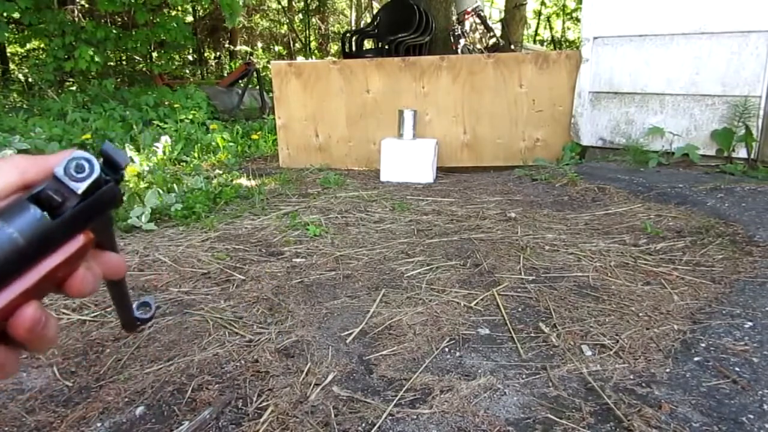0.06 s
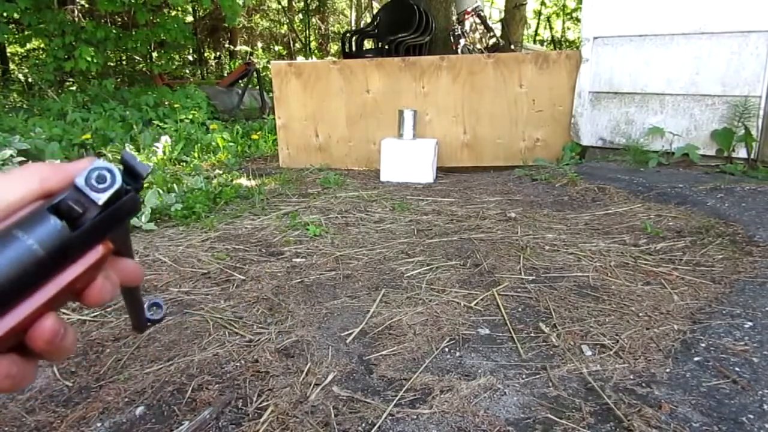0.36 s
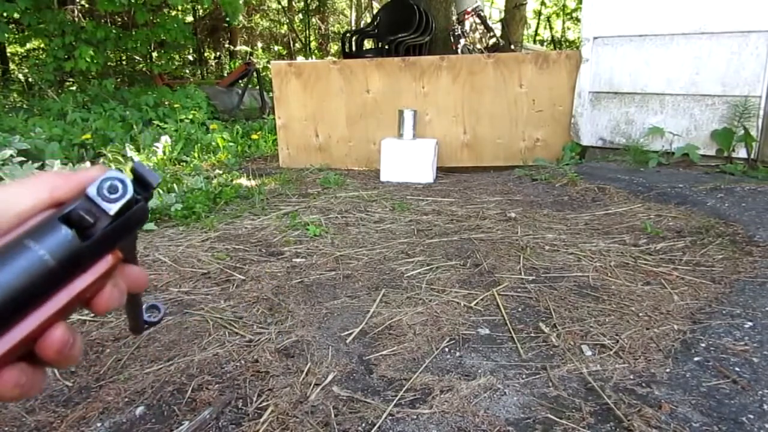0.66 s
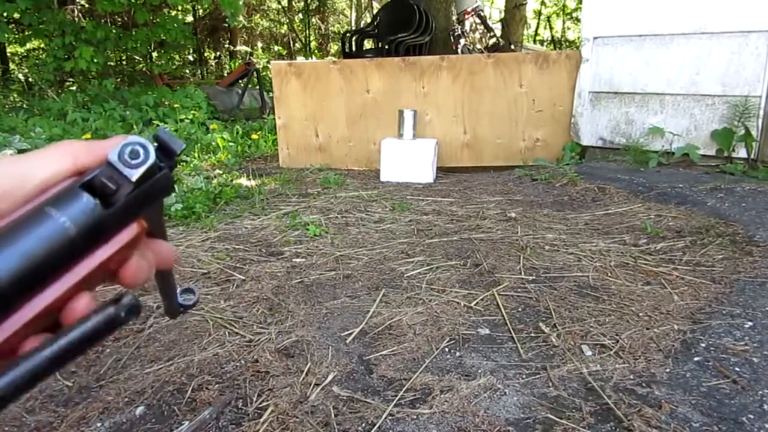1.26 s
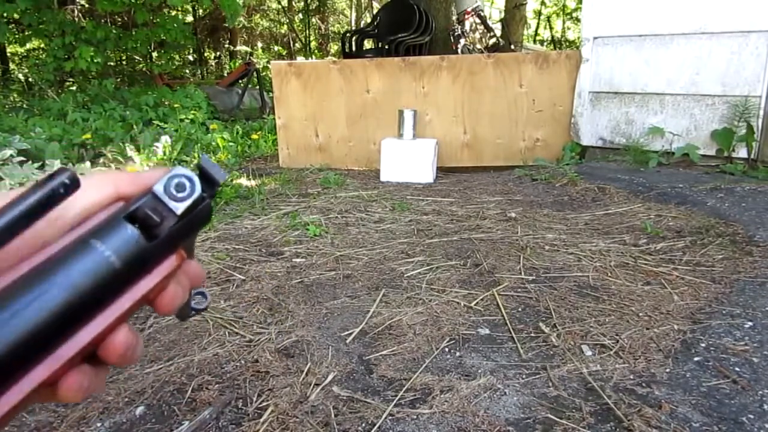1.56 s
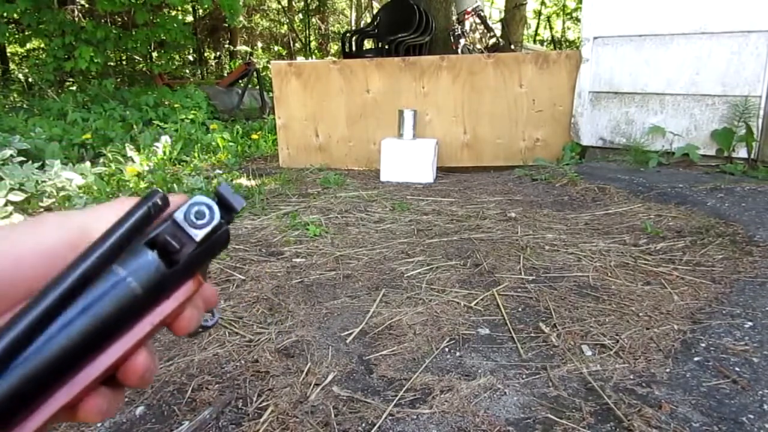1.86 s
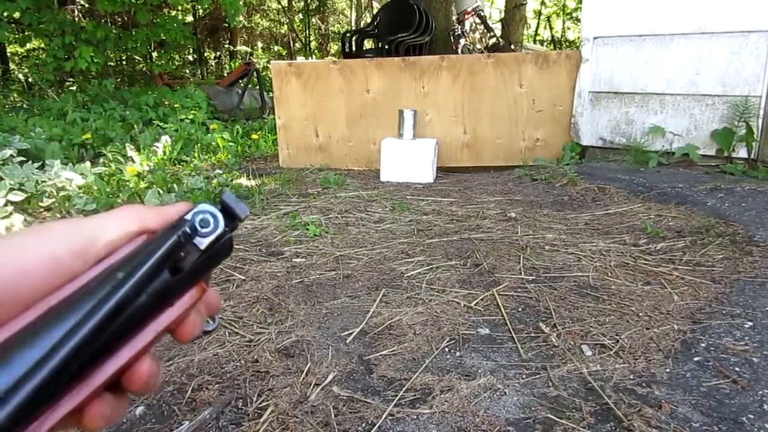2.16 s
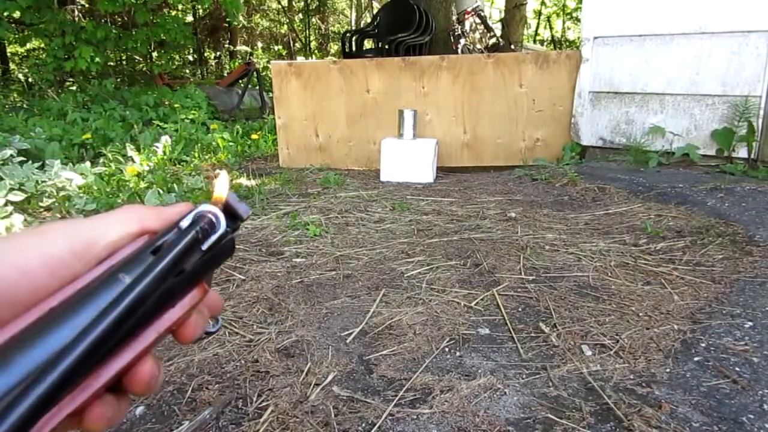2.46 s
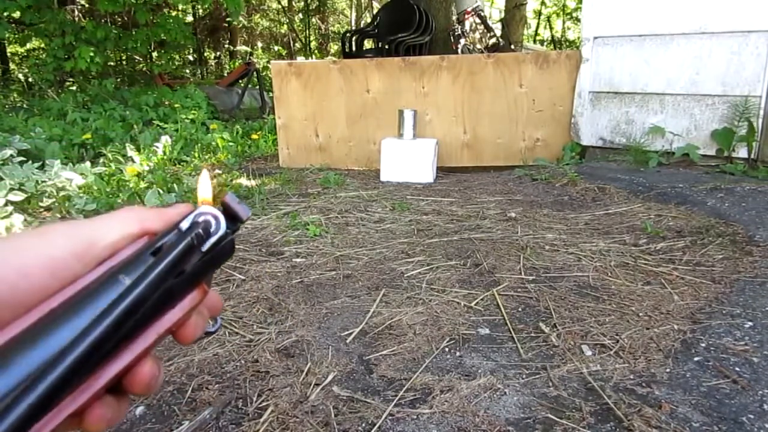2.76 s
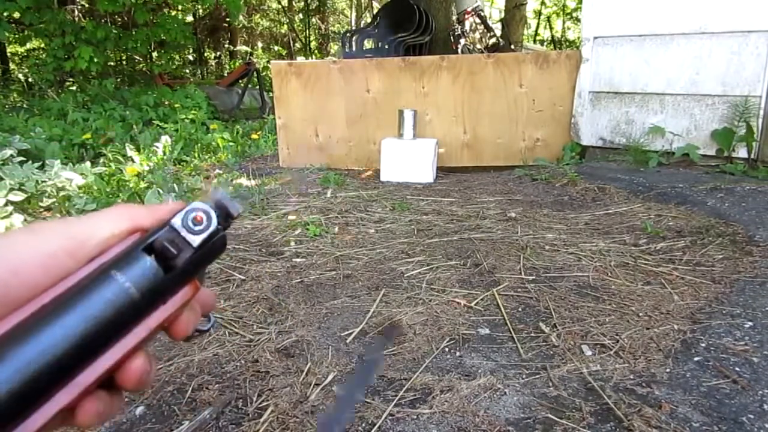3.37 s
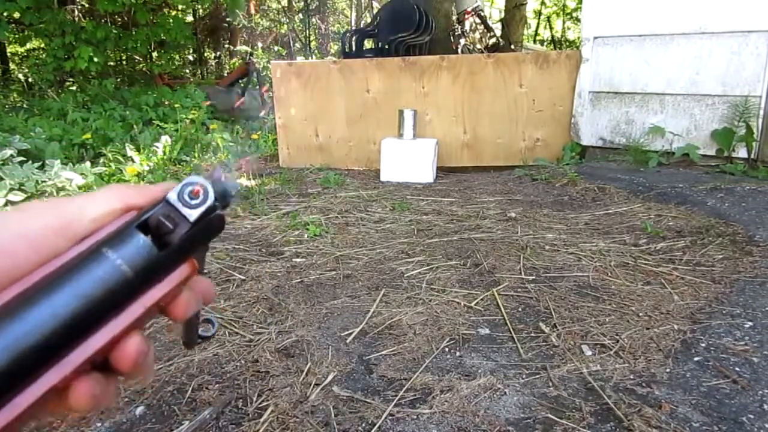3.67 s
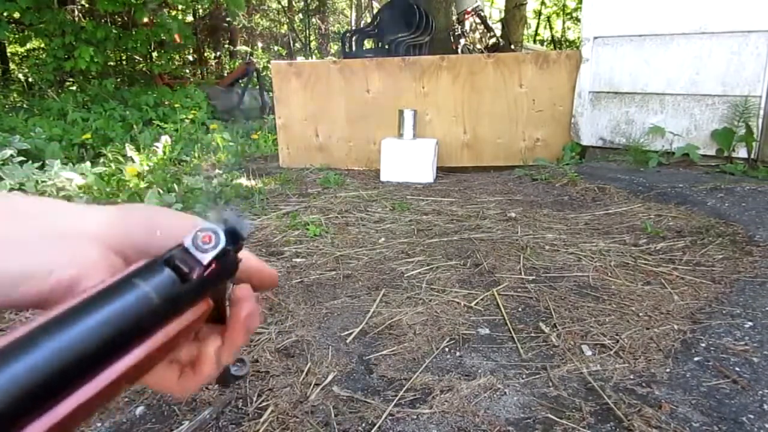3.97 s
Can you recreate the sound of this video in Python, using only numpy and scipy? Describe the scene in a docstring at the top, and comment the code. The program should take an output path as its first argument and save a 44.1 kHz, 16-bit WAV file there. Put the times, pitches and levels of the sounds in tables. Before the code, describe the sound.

A pellet gun's metal parts clack close by, latching at 0.3 seconds, followed by faint hand rubbing. Light taps come near 1 second and around 2. A lighter snaps sharply at 2.4 seconds with a short fading hiss. From about 3.3 a fuse softly hisses and spits. The loudest clacks hit at 3.6, with smaller rattles until 4. A faint motor hum and low outdoor rumble continue throughout.

```python
"""Close metal clacks: the lever and breech of a pellet gun, handled in a back yard. A hand rubs the stock,
a long lighter taps the muzzle, snaps alight and sets a fuse hissing, then the gun clacks again as the
grip changes. Knocks are noise bursts plus ringing modes; the fuse is sputtering noise with sparks.
A motor hums faintly behind it all. The loudest snaps overload the recorder, whose gain control ducks
and slowly recovers."""
import sys
import numpy as np
from scipy import signal
from scipy.fft import rfft, irfft, next_fast_len
from scipy.io import wavfile
from scipy.ndimage import uniform_filter1d

SR = 44100
rng = np.random.default_rng(int(sys.argv[2]) if len(sys.argv) > 2 else 0)


def digitize_waveform(pressure):
    """Quantize a signal to 16-bit integers and store it at the path in sys.argv[1].

    Rows of a 2-D input are taken as channels; values are limited to [-1, 1].
    """
    field = np.atleast_2d(pressure).T
    bounded = np.clip(field, -1, 1)
    quanta = np.round(bounded * 32767).astype(np.int16)
    wavfile.write(sys.argv[1], SR, quanta)


N = 176400
TIME = np.arange(N) / SR

# metal parts knocking: t/s, ring level/dB, focus f/Hz, crack level/dB, thud level/dB
CLACKS = [(.0015, -15.5, 2250, -22.5, -50), (0.1597, -19.5, 1360, -29.5, -62),
          (0.2875, -20.5, 2330, -26.5, -48), (0.2924, -18.5, 1413, -25, -50),
          (0.3339, -13, 1616, -15.5, -38), (3.5817, 0.5, 1690, -9.5, -8.5), (3.5847, -2.5, 3100, -18, -26),
          (3.5892, -14, 1320, -15, -29), (3.6058, 1, 1457, 5.5, -4.5), (3.6500, -13, 2240, -26.5, -23.5),
          (3.7726, -20.5, 1200, -37, -24.5), (3.8063, -19.5, 1630, -19, -33),
          (3.8103, -11, 1548, -23.5, -20), (3.8139, -10.5, 1703, -10.5, -29),
          (3.9085, -12.5, 1536, -28, -25), (3.9368, -21.5, 2020, -26.5, -17.5),
          (3.984, -28.5, 1680, -44, -29)]
# hard-contact spectrum: f/Hz, level/dB
CRACK_SPECTRUM = [(300, -41.5), (3300, -1), (6300, 1), (7900, 2.5), (10000, -3.5), (16000, -14)]
THUD_HZ, THUD_T60_S = 328, 0.011
LATCH_S, LATCH_DB, LATCH_HZ, LATCH_BEAT_HZ, LATCH_T60_S = 0.334, -9, 1160, 95.5, 0.029


def gun():
    """Each clack is ringing steel, a thud in the stock and a crack; the latch adds a beating note."""
    times, ring_db, focus_hz, crack_db, thud_db = np.transpose(CLACKS)
    steel = sum(steel_ring(*clack) for clack in zip(times, ring_db, focus_hz))
    steel = signal.sosfilt(signal.butter(2, [600, 6000], "band", fs=SR, output="sos"), steel)
    thud = ring(clicks(times, from_db(thud_db)), THUD_HZ, THUD_T60_S)
    thud = signal.sosfilt(signal.butter(2, 900, fs=SR, output="sos"), thud)
    crack = colour(bursts(times, crack_db, t60_s=0.01), CRACK_SPECTRUM)
    seat = clicks([LATCH_S], [from_db(LATCH_DB)])
    latch = ring(seat, LATCH_HZ, LATCH_T60_S) - ring(seat, LATCH_HZ + LATCH_BEAT_HZ, LATCH_T60_S)
    return steel + thud + crack + latch


# gun steel modes: f/Hz, level/dB, t60/s
STEEL_MODES = [(735, -5, 0.017), (954, -4.5, 0.02), (1129, -1.5, 0.025), (1388, -2.5, 0.015),
               (1662, -5.5, 0.021), (1950, -5.5, 0.021), (2260, -1.5, 0.014), (2718, -0.5, 0.017),
               (3150, -5, 0.012), (4270, -3.5, 0.011), (4940, -2, 0.0098)]
FOCUS_DB, FOCUS_OCTAVES = 9, 0.2
BOUNCE_GAP_S, BOUNCE_LOSS_DB = 0.0045, 15.5


def steel_ring(start_s, db, focus_hz):
    """The contact point pulls the modes to its pitch and favours those near it; the part bounces twice."""
    hz, mode_db, t60_s = np.transpose(STEEL_MODES)
    nearest = np.argmin(abs(np.log(hz / focus_hz)))
    hz = hz * focus_hz / hz[nearest]
    boost_db = FOCUS_DB * np.exp(-(np.log2(hz / focus_hz) / FOCUS_OCTAVES) ** 2)
    out = 0
    for bounce in range(3):
        shares = from_db(mode_db + boost_db + rng.normal(0, 1, len(hz))) * rng.choice([-1, 1], len(hz))
        strength = from_db(db - BOUNCE_LOSS_DB * np.sqrt(bounce))
        out = out + struck(start_s, hz, strength * shares / np.linalg.norm(shares), t60_s)
        start_s = start_s + BOUNCE_GAP_S * rng.uniform(0.5, 2.2)
    return out


# nozzle on muzzle: t/s, level/dB, ring f/Hz
TAPS = [(0.9904, -37.5, 6140), (1.0213, -30, 1170), (1.832, -38.5, 2260), (2.0045, -34.5, 2260),
        (2.065, -30, 4850), (2.1277, -38, 6300), (2.1683, -35, 5330), (2.2044, -21.5, 5280),
        (3.196, -33.5, 7100), (3.231, -32.5, 5250)]
# tap spectrum: f/Hz, level/dB
TAP_SPECTRUM = [(600, -9), (1100, 2.5), (2800, -1.5), (5400, 3), (16000, -16)]
TAP_TRIM_DB = -3


def nozzle_taps():
    """The lighter's nozzle taps the muzzle: a tick and one ringing mode each time."""
    times, levels_db, _ = np.transpose(TAPS)
    ticks = colour(bursts(times, levels_db, t60_s=0.012), TAP_SPECTRUM)
    rings = sum(struck(start_s, hz, from_db(db), t60_s=0.0099) for start_s, db, hz in TAPS)
    return from_db(TAP_TRIM_DB) * (ticks + rings)


# lighter case modes: f/Hz, level/dB
CASE_MODES = [(1170, -4), (1700, -8), (2350, -10), (2900, -6), (5050, -8.5), (5850, -2.5), (6550, -5),
              (8200, -0.5), (10500, -8), (13200, -8.5)]
# spectrum of the hissing tail after the snap: f/Hz, level/dB
TAIL_SPECTRUM = [(3000, -14), (4500, -2.5), (6500, -5.5), (7900, 2.5), (10000, -17)]
SNAP_S, SNAP_DB, PUSH_LENGTH_S, PUSH_DB = 2.4422, -2.5, 0.00072, -6.5
TAIL_DB, TAIL_T60_S = -36.5, 0.33
GAS_HZ, GAS_DB, GAS_SPAN_S = 3850, -66, (2.9, 3.119, 3.4, 3.9)


def lighter():
    """The striker pushes, snaps and rings the case; a bright hissing tail fades; the gas whistles."""
    push_phase = np.pi * np.clip((SNAP_S - TIME) / PUSH_LENGTH_S, 0, 1)
    push = -from_db(PUSH_DB) * np.sqrt(np.sin(push_phase).clip(0))
    snap = colour(bursts([SNAP_S], [SNAP_DB], t60_s=0.012), CRACK_SPECTRUM)
    case_hz, case_db = np.transpose(CASE_MODES)
    signs = (-1) ** np.arange(len(case_hz))
    case = struck(SNAP_S, case_hz, from_db(case_db) * signs, t60_s=0.013)
    tail = from_db(TAIL_DB) * decay(SNAP_S, TAIL_T60_S) * noise(TAIL_SPECTRUM)
    gas = from_db(GAS_DB) * np.interp(TIME, GAS_SPAN_S, [0, 1, 1, 0]) * narrow(GAS_HZ, width_hz=300)
    return push + snap + case + tail + gas


# burn strength: t/s, level/dB
BURN_LEVEL = [(2.95, -71), (3.335, -61), (3.36, -46.5), (3.44, -48.5), (3.57, -50.5), (3.7, -48.5),
              (3.79, -56), (3.86, -51.5)]
# powder spits: t/s, level/dB
SPITS = [(3.025, -45), (3.1077, -44), (3.315, -42), (3.4267, -29.5), (3.4452, -18)]
# hiss spectrum: f/Hz, level/dB
FUSE_SPECTRUM = [(200, -3.5), (1650, 1), (3000, -5), (3900, -2), (5200, -3.5), (10500, -7), (15000, -22)]
# flare spectrum: f/Hz, level/dB
FLARE_SPECTRUM = [(170, 2.5), (400, -1), (1000, 3), (1600, -5), (3000, -23)]
SPARKS_PER_S, SPARKS_DB, SPUTTERS_PER_S, SPUTTER_DB = 560, -9.5, 140, 2.5
SIZZLE_HZ, SIZZLE_DB = 10330, -8
FLARE_S, FLARE_ATTACK_S, FLARE_T60_S, FLARE_DB = 3.34, 0.025, 1, -39


def fuse():
    """The powder catches with a soft flare and burns unevenly: hiss, high sizzle, sparks and spits."""
    spark_sizes = from_db(7.8 * np.minimum(rng.exponential(1, N), 4)) * rng.choice([-1, 1], N)
    sparks = unit_rms(spark_sizes * (rng.random(N) < SPARKS_PER_S / SR))
    burn_db = np.interp(TIME, *np.transpose(BURN_LEVEL)) + SPUTTER_DB * drift(SPUTTERS_PER_S)
    burn = from_db(burn_db) * (TIME > BURN_LEVEL[0][0])
    jet = burn * (rng.standard_normal(N) + from_db(SPARKS_DB) * sparks)
    sizzle = burn * from_db(SIZZLE_DB) * narrow(SIZZLE_HZ, width_hz=2100)
    flare_rise = np.clip((TIME - FLARE_S) / FLARE_ATTACK_S, 0, 1)
    flare = from_db(FLARE_DB) * flare_rise * decay(FLARE_S, FLARE_T60_S) * noise(FLARE_SPECTRUM)
    spits = bursts(*np.transpose(SPITS), t60_s=0.012)
    return colour(jet + spits, FUSE_SPECTRUM) + sizzle + flare


# slides on the stock: centre t/s, length/s, level/dB
RUBS = [(0.358, 0.1, -54.5), (0.473, 0.064, -49), (0.559, 0.063, -52.5), (0.94, 0.043, -55)]
# rub spectrum: f/Hz, level/dB
RUB_SPECTRUM = [(300, 1), (2400, 3), (4000, -0.5), (9000, -3), (16000, -17)]
# grip squeaks: centre t/s, length/s, level/dB, f/Hz
SQUEAKS = [(0.059, 0.055, -60, 2900), (.78, .2, -65.5, 2400), (1.172, 0.0092, -50, 5700)]
SLIP_DEPTH_DB = 5


def hand():
    """Skin sticks and slips over the stock in grainy swells and squeaks faintly where it grips."""
    slips = from_db(SLIP_DEPTH_DB * drift(rate_hz=350))
    rubs = sum(swell(*rub) for rub in RUBS) * unit_rms(slips * noise(RUB_SPECTRUM))
    squeaks = sum(swell(centre_s, length_s, db) * unit_rms(slips * narrow(hz, width_hz=1300))
                  for centre_s, length_s, db, hz in SQUEAKS)
    return rubs + squeaks


ECHO_S, ECHO_DB, SCATTER_DB, SCATTER_T60_S = 0.013, -28.5, -22, 0.066


def yard_echo(x):
    """One echo from the house wall, trailed by a short, faint scatter."""
    scatter = decay(ECHO_S, SCATTER_T60_S) * rng.standard_normal(N)
    scatter = from_db(SCATTER_DB) * scatter / np.linalg.norm(scatter)
    wall = clicks([ECHO_S], [from_db(ECHO_DB)])
    return signal.fftconvolve(x, wall + scatter)[:N]


# background hum and hiss level, a set curve swelling as the recorder's gain recovers: t/s, level/dB
BACKGROUND_LEVEL = [(.2, -54.5), (1.1, -48.5), (2.35, -47.5), (4, -53.5)]
# motor tones: f/Hz, relative level/dB
HUMS = [(78.6, -2.5), (1500, -12.5)]
# hiss spectrum: f/Hz, level/dB
AIR_SPECTRUM = [(2400, 0), (5500, -2.5), (10500, -5.5), (16000, -18)]
FLUTTER_DB, WANDER_HZ, WHINE_HZ, WHINE_DB = 3.5, 2.19, 1265, -8
AIR_DB, AIR_SWELL_SHARE = -62, 0.63


def hum_and_hiss():
    """A motor's fluttering hum and whine, and airy hiss; all swell early and ease off later."""
    level_db = np.interp(TIME, *np.transpose(BACKGROUND_LEVEL))
    hum = 0
    for hz, db in HUMS:
        flutter = from_db(FLUTTER_DB * np.tanh(drift(rate_hz=30)))
        phase = 2 * np.pi * np.cumsum(hz + WANDER_HZ * drift(rate_hz=20)) / SR
        hum = hum + from_db(db) * unit_rms(flutter * np.sin(phase))
    whine = from_db(WHINE_DB) * narrow(WHINE_HZ, width_hz=100)
    air = from_db(AIR_DB + AIR_SWELL_SHARE * (level_db - level_db.mean())) * noise(AIR_SPECTRUM)
    return from_db(level_db) * (hum + whine) + air


# rumble strength: t/s, level/dB
RUMBLE_LEVEL = [(.26, -52), (.45, -47), (.9, -51), (1.25, -51.5), (1.6, -46), (2.35, -50), (2.7, -50),
                (4, -48.5)]
# rumble spectrum: f/Hz, level/dB
RUMBLE_SPECTRUM = [(20, -2.5), (55, 7), (110, 5.5), (220, 1), (500, -1), (760, -5), (880, -0.5), (1100, -7),
                   (1400, -6.5), (1580, -7), (1900, -20), (4000, -40)]


def rumble():
    """Low outdoor noise that slowly rises and falls."""
    return from_db(np.interp(TIME, *np.transpose(RUMBLE_LEVEL))) * noise(RUMBLE_SPECTRUM)


def from_db(db):
    """Decibels to gain."""
    return 10 ** (np.asarray(db) / 20)


def unit_rms(x):
    """Scale to unit power."""
    return x / np.sqrt(np.mean(x ** 2) + 1e-20)


def colour(x, spectrum):
    """Minimum-phase filter through (f/Hz, level/dB) points; white noise keeps its power."""
    hz, db = np.transpose(spectrum)
    size = next_fast_len(2 * N)
    bin_hz = np.arange(size // 2 + 1) * SR / size
    gain = unit_rms(from_db(np.interp(np.log(bin_hz + 1), np.log(hz), db)))
    cepstrum = irfft(np.log(gain), size)
    cepstrum[1:size // 2] *= 2
    cepstrum[size // 2 + 1:] = 0
    return irfft(rfft(x, size) * np.exp(rfft(cepstrum)), size)[:N]


def noise(spectrum):
    """Coloured noise of unit power."""
    return colour(rng.standard_normal(N), spectrum)


def narrow(hz, width_hz):
    """A wavering tone: noise twice through one resonance."""
    b, a = signal.iirpeak(hz, hz / width_hz, fs=SR)
    once = signal.lfilter(b, a, rng.standard_normal(N + SR))
    return unit_rms(signal.lfilter(b, a, once)[SR:])


def drift(rate_hz):
    """Random points joined by lines, unit power."""
    return unit_rms(np.interp(TIME * rate_hz, np.arange(N), rng.standard_normal(N)))


def decay(start_s, t60_s):
    """Sudden onset, exponential decay."""
    return (TIME >= start_s) * np.exp(-np.log(1000) * np.clip((TIME - start_s) / t60_s, 0, 10))


def swell(centre_s, length_s, db):
    """Gaussian rise and fall."""
    return from_db(db) * np.exp(-(2 * (TIME - centre_s) / length_s) ** 2)


def clicks(times, gains):
    """Single-sample clicks."""
    return np.bincount(np.clip(np.asarray(times) * SR, 0, N - 1).astype(int), gains, N)


def bursts(times, db, t60_s):
    """Fast-dying bursts of random-sign noise."""
    pole = from_db(-60 / (t60_s * SR))
    envelope = signal.lfilter([1], [1, -pole], clicks(times, from_db(db)) + 1e-18)
    return envelope * rng.choice([-1, 1], N)


def ring(x, hz, t60_s):
    """Resonator: each click starts a decaying tone."""
    radius, angle = np.exp(-np.log(1000) / (t60_s * SR)), 2 * np.pi * hz / SR
    return signal.lfilter([1, -1], [1, -2 * radius * np.cos(angle), radius ** 2], x + 1e-18)


def struck(start_s, hz, gains, t60_s):
    """One blow sets modes ringing."""
    age_s = TIME[:SR // 10, None]
    modes = gains * np.sin(2 * np.pi * hz * age_s) * np.exp(-np.log(1000) * age_s / t60_s)
    return np.concatenate([np.zeros(int(start_s * SR)), modes.sum(axis=1), np.zeros(N)])[:N]


def scene():
    """Everything near the hands, its echo and the background."""
    near = gun() + nozzle_taps() + lighter() + fuse() + hand()
    return (near + yard_echo(near) + hum_and_hiss() + rumble())[None]


DUCK_ABOVE_DB, DUCK_MAX_DB, DUCK_ATTACK_S, RECOVER_DB_PER_S = -10.5, 10, 0.0023, 11
CUTOFF_HZ = 15000


def record(dry):
    """Gain control ducks after loud snaps, peaks clip, the top is cut."""
    level_db = 10 * np.log10(np.maximum(uniform_filter1d(dry[0] ** 2, size=88), 1e-12))
    over_db = np.clip(level_db - DUCK_ABOVE_DB, 0, DUCK_MAX_DB)
    recovery_db = RECOVER_DB_PER_S * TIME
    held_db = np.maximum.accumulate(over_db + recovery_db) - recovery_db
    pole = np.exp(-1 / (DUCK_ATTACK_S * SR))
    duck_db = signal.lfilter([1 - pole], [1, -pole], held_db)
    clipped = np.clip(dry * from_db(-duck_db), -1, 1)
    return signal.sosfilt(signal.ellip(10, 0.2, 90, CUTOFF_HZ, fs=SR, output="sos"), clipped)


dry = scene()
out = record(dry)
digitize_waveform(out)
```